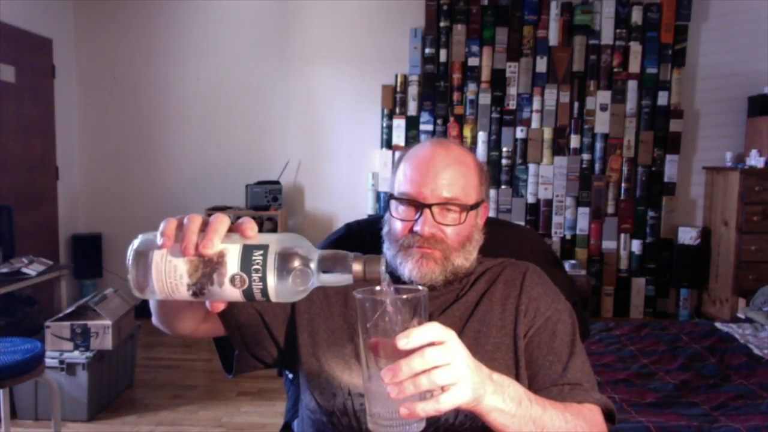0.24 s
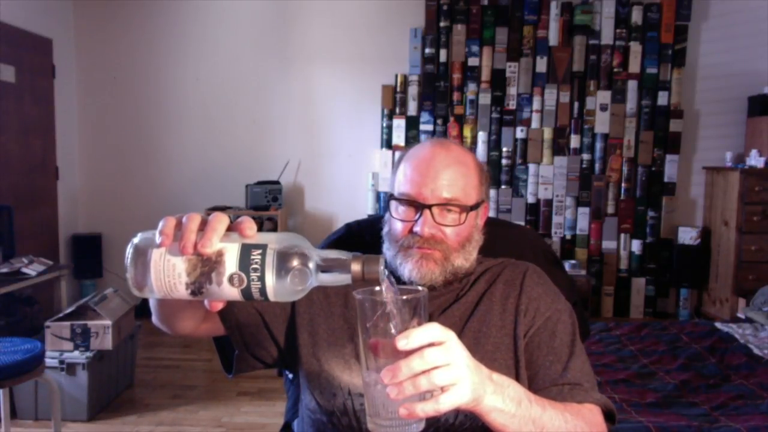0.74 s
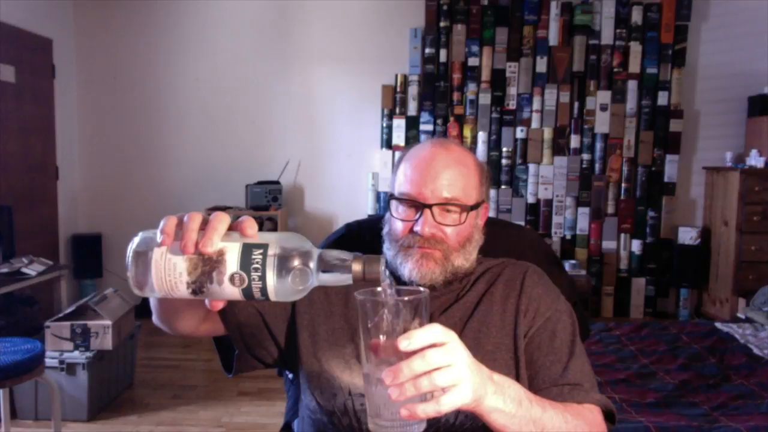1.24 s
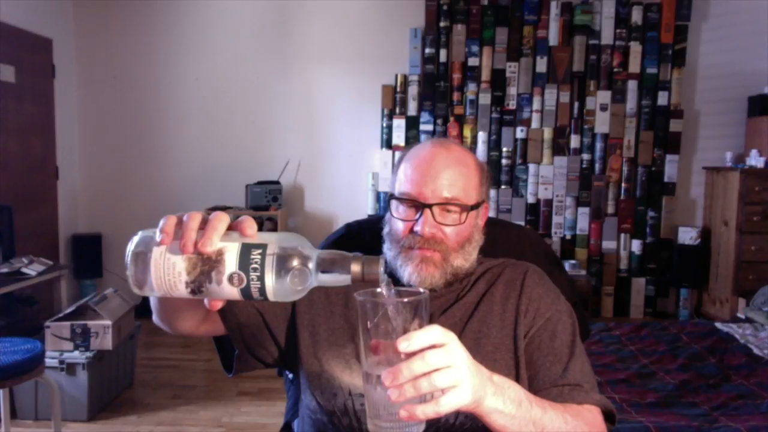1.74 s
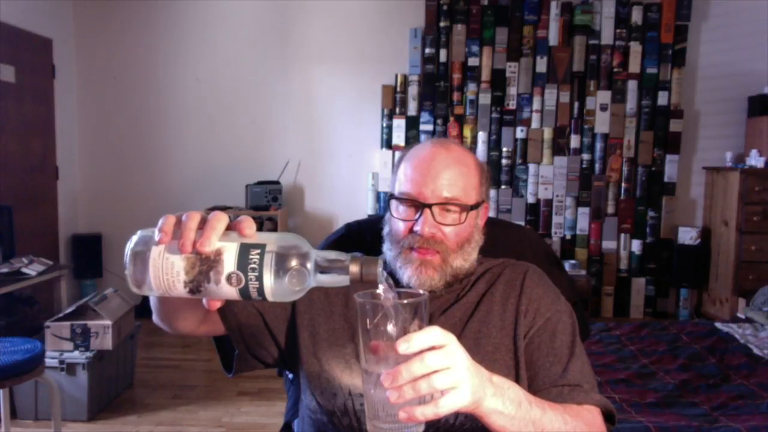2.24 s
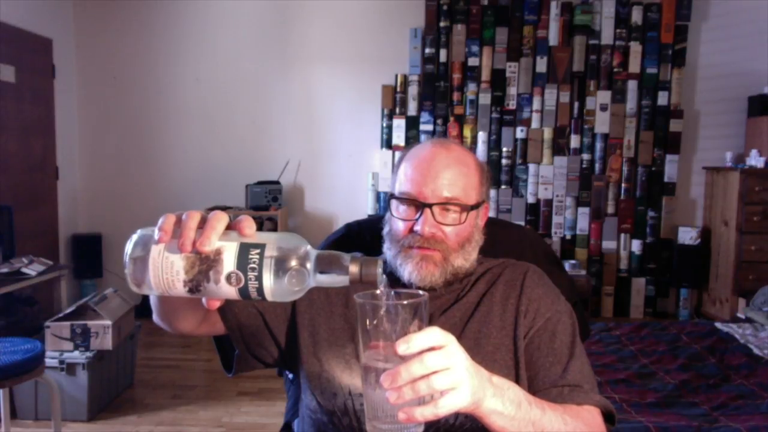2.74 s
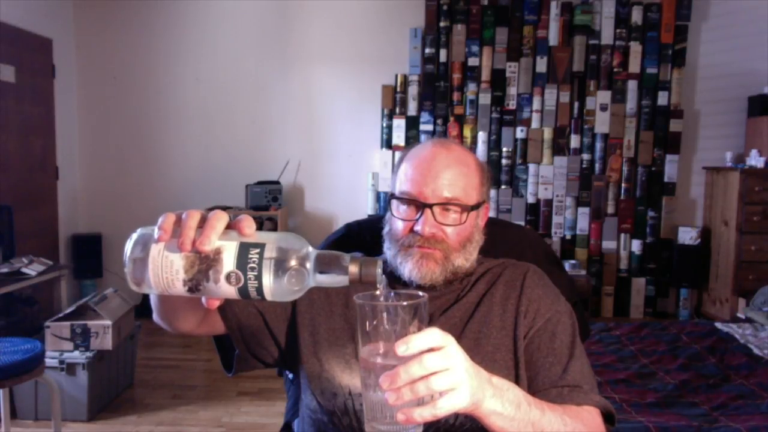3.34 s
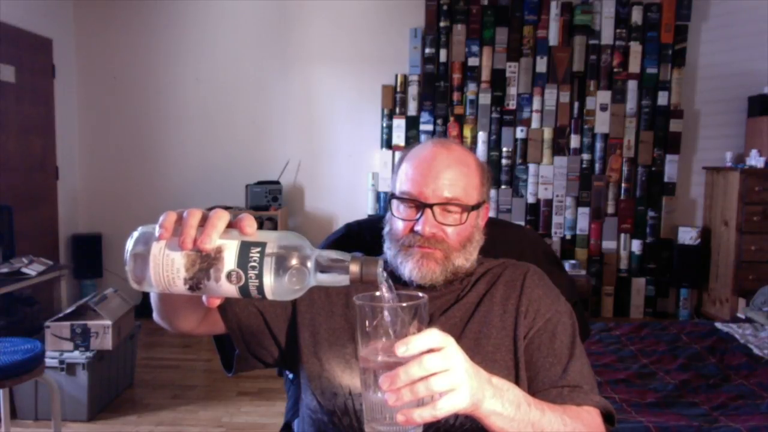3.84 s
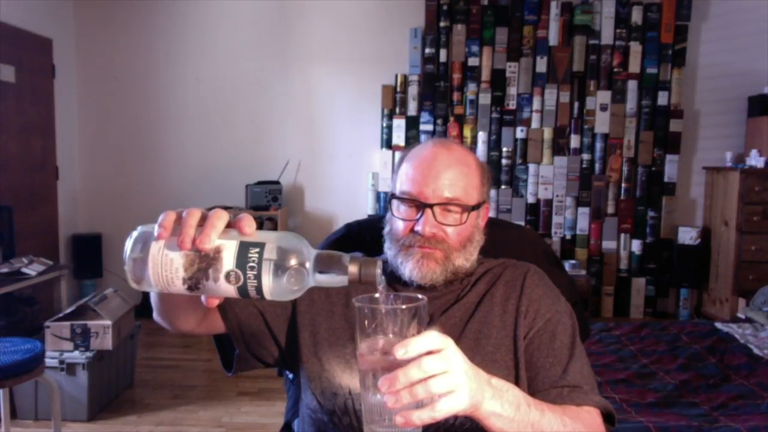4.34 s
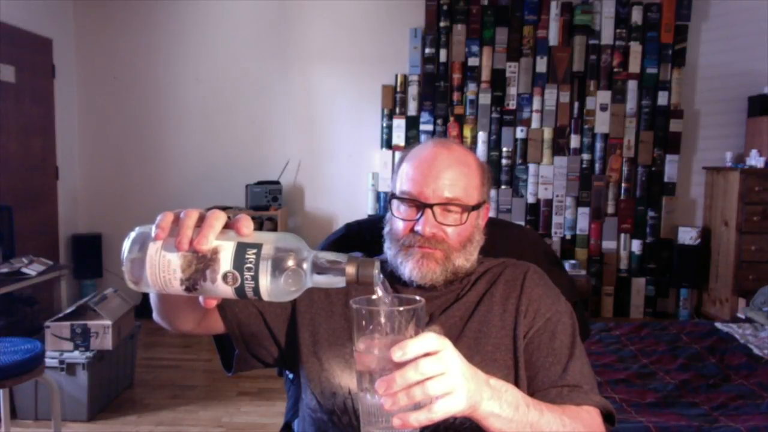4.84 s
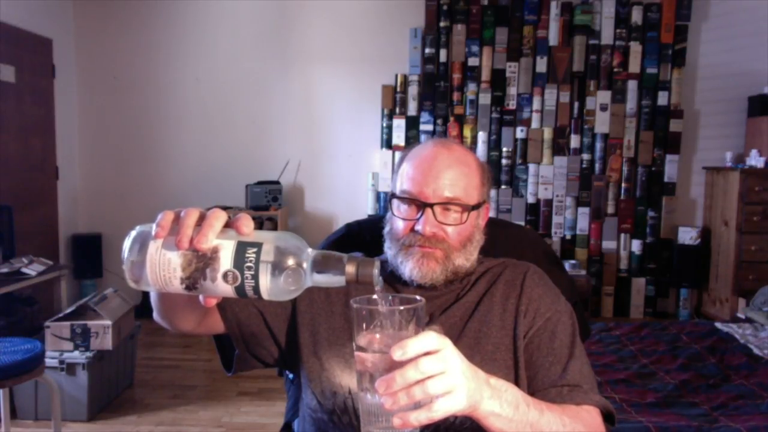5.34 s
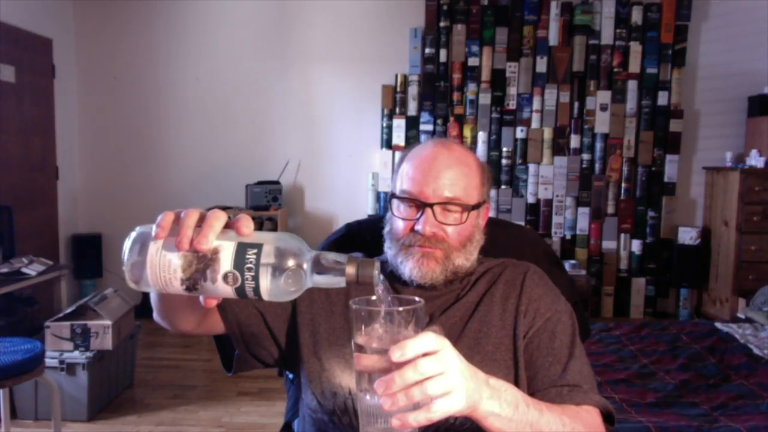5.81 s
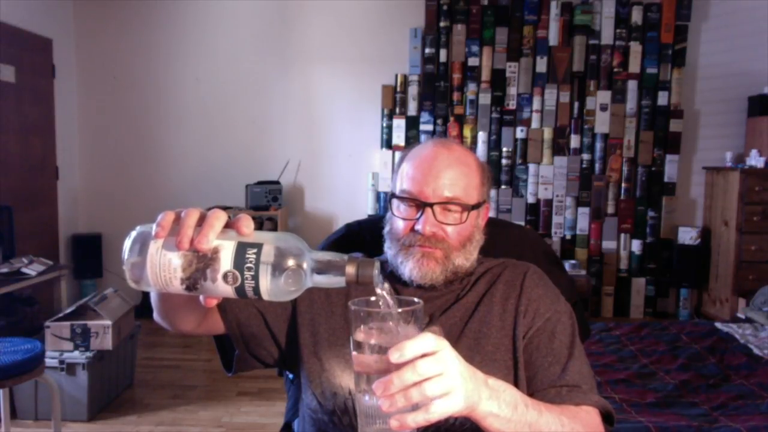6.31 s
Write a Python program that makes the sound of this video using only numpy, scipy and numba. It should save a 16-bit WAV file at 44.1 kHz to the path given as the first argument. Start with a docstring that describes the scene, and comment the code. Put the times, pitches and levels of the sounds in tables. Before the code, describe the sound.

Water glugs from a glass bottle into a tall drinking glass in quick uneven gulps, with bright splashes and popping bubbles in a small room.

```python
"""Glugs of water poured from a bottle ring in a tall drinking glass, in a small furnished room, a metre from
the microphone: each plunge rings the air column, and further glugs ring beside the column's main pitch.
Splashes and small pops are clusters of high, short rings; fizz is thousands of tiny ones.
The mouth of the glass beams the treble at the ceiling, which returns every pop 6 ms later, before the walls.
A room tail of decaying noise follows; the rush of the stream, a faint hum and hiss lie underneath."""
import sys
import numpy as np
from scipy import signal
from scipy.fft import rfft, irfft
from scipy.io import wavfile
from numba import njit

SR = 44100
rng = np.random.default_rng(int(sys.argv[2]) if len(sys.argv) > 2 else 0)


def magnitude_from_level(level_db):
    """Linear magnitude for a level in decibels (20 dB per decade)."""
    exponent = np.asarray(level_db, float) / 20
    return 10 ** exponent


def master_out(mix):
    """Clip the mix to full scale and print it as 16-bit PCM to the path in sys.argv[1]."""
    frames = np.transpose(np.atleast_2d(mix))
    ceiling = np.clip(frames, -1, 1)
    pcm = np.round(ceiling * 32767).astype(np.int16)
    wavfile.write(sys.argv[1], SR, pcm)


N = 289913  # length in samples


# air column above the water, mostly rising as the glass fills: t/s, f/Hz, fizz gain/dB
AIR_COLUMN = [(0, 938, -59), (.9, 854, -55), (1.6, 828, -61.5), (2.1, 926, -53), (2.9, 911, -63),
              (3.4, 1091, -53.5), (3.6, 980, -64), (4.1, 1127, -58.5), (5.1, 1133, -68.5),
              (5.6, 1079, -63.5), (6.57, 1120, -61)]
# slugs of water plunging in: t/s, level/dB (peak), decay/cycles
PLUNGES = [(.001, -28.5, 0.81), (.546, -33, 2.8), (0.601, -32, 2), (.813, -25, 6.7), (.878, -25.5, 10.6),
           (0.916, -26, 3.5), (1.124, -27, 2.7), (1.166, -29.5, 9.2), (1.264, -29, 8.3),
           (1.526, -37.5, 4.5), (1.557, -26, 6.1), (1.634, -31.5, 2.9), (1.726, -31, 4.4),
           (2.096, -21, 8.1), (2.155, -25, 3.1), (2.434, -38.5, 5.4), (2.56, -31, 4.4), (2.793, -33, 7.9),
           (2.909, -23, 3), (2.963, -21, 1.8), (3.199, -24, 3), (3.231, -33, 5.9), (3.414, -24, 7.4),
           (3.562, -28, 4.5), (3.6, -32, 3.2), (3.737, -38, 7), (3.847, -35, 3.5), (3.989, -26, 3),
           (4.032, -33.5, 10.5), (4.069, -26.5, 6.3), (4.18, -30.5, 3.8), (4.286, -16.5, 1.43),
           (4.524, -26, 0.93), (4.563, -22.5, 5.9), (4.678, -31, 9.4), (4.761, -32.5, 4.1),
           (4.852, -24.5, 1.3), (4.95, -30.5, 2.5), (5.117, -30.5, 12.4), (5.239, -31.5, 2.6),
           (5.293, -34, 2.4), (5.682, -29, 2.2), (5.759, -30, 9.9), (5.868, -31, 7.2), (5.966, -27.5, 0.81),
           (6.122, -32, 9.3), (6.432, -34, 2.7)]
PLUNGE_SCATTER = 0.03  # standard deviation, share of the pitch


def plunges():
    """Each slug of water rings the air column at its pitch of the moment and sheds small bubbles."""
    s, db, cycles = np.transpose(PLUNGES)
    column_s, column_hz, _ = np.transpose(AIR_COLUMN)
    scatter = 1 + PLUNGE_SCATTER * rng.standard_normal(len(s))
    hz = np.interp(s, column_s, column_hz) * scatter
    rings = bubbles(s, db, hz, cycles / hz, rise_share=0.17, glide=0.006)
    return rings + shed(s, db, hz, count=3)


# rings off the column's main pitch: low bubbles, and late in the pour a higher resonance
# near 1.5 kHz: t/s, level/dB (peak), f/Hz
GLUGS = [(.035, -35.5, 552), (.14, -25, 690), (.312, -32.5, 760), (.326, -44, 362), (0.702, -38.5, 997),
         (0.748, -37.5, 545), (.801, -26.5, 673), (1.063, -32, 585), (1.143, -34, 1002), (1.48, -36.5, 950),
         (1.677, -43, 533), (2.18, -23.5, 1064), (2.181, -27.5, 804), (2.521, -32.5, 1074),
         (2.712, -36, 1057), (2.791, -33, 1183), (2.961, -42, 438), (3.2, -38.5, 493), (2.193, -44.5, 421),
         (3.6, -39, 457), (3.6, -39, 638), (3.946, -43.5, 348), (4.181, -36.5, 634), (4.286, -34, 468),
         (4.286, -26.5, 619), (4.34, -38.5, 666), (4.526, -42, 500), (4.58, -34.5, 612),
         (4.851, -30.5, 586), (4.95, -41.5, 447), (5.193, -33.5, 613), (5.29, -36.5, 626),
         (5.345, -32.5, 1510), (5.38, -33.5, 1490), (5.421, -35, 1510), (5.535, -31, 1366),
         (5.616, -38.5, 573), (5.871, -36, 647), (5.965, -37.5, 466), (5.989, -38, 373),
         (6.118, -30.5, 1460), (6.329, -24, 1503), (6.281, -37, 730), (6.326, -29.5, 634)]
GLUG_CYCLES = 3.92  # decay to 1/e


def glugs():
    """Low bubbles and a late, higher resonance ring for several cycles, glide slightly up and shed bubbles."""
    s, db, hz = np.transpose(GLUGS)
    rings = bubbles(s, db, hz, GLUG_CYCLES / hz, rise_share=0.2, glide=0.011)
    return rings + shed(s, db, hz, count=3)


# bubbles shed by a parent, linking the notes: level below it, mean delay, pitch spread (+- log), decay
SHED_DB, SHED_LATE_S, SHED_SPREAD, SHED_CYCLES = -9.5, 0.025, 0.14, 4.1


def shed(s, db, hz, count):
    """Daughter bubbles trail their parents, weaker and detuned."""
    s, db, hz = np.repeat([s, db, hz], count, axis=1)
    late, big, pitch = rng.random((len(s), 3)).T
    s = s - SHED_LATE_S * np.log(1 - late)
    db = db + SHED_DB - 8 * big
    hz = hz * np.exp(SHED_SPREAD * (2 * pitch - 1))
    return bubbles(s, db, hz, SHED_CYCLES / hz, rise_share=0.29, glide=0.028)


def bubbles(s, db, hz, fall_s, rise_share, glide):
    """Rings at the given peak levels; the rise takes a share of the fall."""
    fall = np.maximum(fall_s * SR, 1)
    share = max(rise_share, .01)
    # highest point of the swell-and-decay envelope
    peak = (share / (3 + share)) ** share * (3 / (3 + share)) ** 3
    start = (s * SR).astype(int).clip(0, N - 1)
    return ring(start, hz, share * fall, fall, glide, magnitude_from_level(db) / peak, N)


@njit
def ring(start, hz, rise, fall, glide, size, n):
    """Sines that swell in `rise` samples, die in `fall` samples and slide up meanwhile."""
    out = np.zeros(n)
    for k in range(len(start)):
        phase, step = 0., 2 * np.pi * hz[k] / SR
        for i in range(min(int(7 * fall[k]), n - start[k])):
            envelope = (1 - np.exp(-i / rise[k])) ** 3 * np.exp(-i / fall[k])
            out[start[k] + i] += size[k] * envelope * np.sin(phase)
            phase += step * (1 + glide * min(i / fall[k], 2))
    return out


POP_UP_DB, POP_UP_DB_PER_OCTAVE, POP_UP_LEAST_DB = 8.5, 13.5, -8


def beam_db(hz):
    """Ceiling echo of a pop over its direct sound: the glass beams high pitches upward."""
    rise = POP_UP_DB_PER_OCTAVE * np.log2(hz / 7500)
    return np.clip(POP_UP_DB + rise, POP_UP_LEAST_DB, POP_UP_DB)


# levels in these three tables are nominal: droplet scatter and glass colour follow
# blunt, wide splashes: t/s, level/dB, f/Hz (centre)
SPLASHES = [(0.014, -25, 8300), (0.0369, -17, 8000), (0.0377, -23, 13400), (0.547, -30, 1630),
            (0.65, -33, 10300), (0.727, -24, 14000), (0.9042, -25.5, 4100), (1.2413, -30, 11500),
            (1.24, -18, 5200), (1.416, -28.5, 11900), (1.5328, -24.5, 9100), (2.18, -20, 10300),
            (2.437, -23.5, 9500), (2.586, -33, 9600), (2.626, -24.5, 7900), (2.629, -21.5, 13100),
            (2.68, -30.5, 9200), (2.737, -27.5, 6760), (2.738, -28, 11900), (2.7463, -26, 3280),
            (2.961, -25.5, 7800), (3.2004, -20, 11550), (3.201, -29, 6060), (3.2763, -22, 5560),
            (3.599, -25.5, 10200), (3.7349, -24, 3680), (3.837, -29, 7700), (3.9372, -18, 11300),
            (3.981, -28.5, 4800), (4.067, -20.5, 5300), (4.094, -25, 12400), (4.1805, -21.5, 12100),
            (4.228, -28, 7560), (4.285, -26, 4650), (4.2855, -20, 1740), (4.4281, -22.5, 12200),
            (4.4276, -24, 7400), (4.478, -24, 13300), (5.418, -28.5, 3640), (5.761, -22, 11200),
            (5.76, -25, 1510), (5.869, -23.5, 1880), (6.0846, -26.5, 10900), (6.2767, -26.5, 7200),
            (6.2784, -22, 1640), (6.3221, -23.5, 2230), (6.4786, -22, 3440), (6.4831, -27, 8360)]
# small bubbles with a clear pitch: t/s, level/dB, f/Hz
POPS = [(5.341, -42.5, 4400), (5.684, -40, 4380), (0.013, -26.5, 3600), (0.117, -39.5, 4500),
        (.450, -47, 8170), (.300, -47, 8100), (0.489, -40.5, 5350), (.935, -37, 2200), (1.22, -36.5, 3000),
        (.938, -39, 8000), (1.528, -33, 6000), (1.070, -40, 11880), (1.177, -37.5, 1900), (2.1, -35, 3250),
        (1.883, -33.5, 5050), (1.906, -34, 3100), (1.993, -44, 7150), (5.631, -46, 7900),
        (1.221, -41.5, 12300), (2.299, -44, 8000), (2.341, -47, 7900), (2.458, -37.5, 4970),
        (2.458, -31.5, 5720), (2.483, -38.5, 3780), (4.476, -39, 1873), (2.4, -37, 4000),
        (1.344, -39, 15000), (2.767, -38.5, 4780), (3.382, -41.5, 11000), (3.3, -41.5, 1760),
        (3.5, -34.5, 5270), (3.6, -38.5, 3150), (4.3984, -36.5, 5100), (4.747, -39.5, 3100),
        (5.356, -43.5, 10800), (4.982, -38.5, 11500), (2.0377, -42.5, 11340), (5.0967, -36, 8640),
        (1.415, -36, 4150), (5.418, -42, 10500), (2.323, -43, 13000), (2.4645, -38, 14000),
        (5.2, -35, 5100), (5.967, -38, 5750), (5.992, -38.5, 1600), (6.0633, -27, 5080), (2.6, -37, 15300),
        (6.411, -47.5, 12180), (6.508, -33.5, 1980), (0.016, -27, 1990), (0.225, -42, 9900),
        (0.344, -24.5, 13500), (0.345, -28.5, 7430), (0.4512, -34.5, 13000), (0.5804, -34, 3900),
        (0.5992, -35.5, 6900), (0.8658, -29.5, 4050), (0.866, -36, 12300), (0.8669, -37.5, 8000),
        (1.0536, -35, 5200), (1.0676, -38.5, 7770), (1.1662, -32.5, 10300), (1.3722, -34.5, 8500),
        (1.372, -28.5, 12260), (1.415, -37, 7400), (1.4543, -32, 7680), (1.7293, -39.5, 7900),
        (1.8373, -24, 8500), (1.889, -28.5, 2640), (1.884, -34, 6130), (2.0832, -31.5, 8840),
        (2.05, -39, 2900), (2.143, -32, 5240), (2.3, -35.5, 3720), (3.0308, -44, 11950),
        (2.9513, -32, 3880), (4.038, -36, 3000), (3.078, -29.5, 2720), (4.427, -34.5, 1750),
        (3.081, -36.5, 5400), (3.5638, -41, 12700), (3.2491, -29, 2700), (3.5634, -33, 5070),
        (3.575, -35, 4100), (3.567, -37.5, 1810), (3.673, -33, 13600), (3.6, -31, 11100),
        (4.0664, -37.5, 8440), (4.067, -23, 3030), (4.226, -27, 3890), (4.23, -33, 10660),
        (4.2843, -29.5, 8750), (4.354, -29.5, 2960), (4.428, -29, 5370), (4.4258, -25, 3550),
        (4.4278, -25, 13900), (4.6293, -32, 2070), (4.637, -24, 4270), (5.3, -32.5, 13900),
        (4.853, -37.5, 2940), (4.986, -43, 8970), (5.0706, -38.5, 13060), (3.758, -42, 8100),
        (3.2, -43, 9800), (5.359, -37, 2760), (5.538, -38.5, 5700), (4.0678, -35, 14600),
        (5.691, -43, 9340), (5.8687, -30.5, 13150), (5.8676, -31.5, 6600), (6.275, -27.5, 3240)]
# small bubbles that burst toward the microphone and send little upward: t/s, level/dB, f/Hz
SIDE_POPS = [(.8168, -36, 13400), (3.2508, -16, 6550), (4.716, -42, 12700), (4.852, -39.5, 6750),
             (5.7345, -29.5, 9600), (5.9663, -40.5, 8140), (6.137, -36, 13600), (6.344, -38.5, 7640)]
SPLASH_SHARP, POP_SHARP = 2.33, 9.5  # sharpness: centre over spread
# ceiling echo over the direct sound; splashes lose it as the glass fills
SPLASH_UP_DB, SPLASH_UP_LOSS_DB_PER_S, SIDE_UP_DB = 8.5, 1.5, -3.5


def treble_events():
    """Rows (t/s, level/dB, f/Hz, sharpness, upward gain/dB) of splashes and pops."""
    rows = []
    for s, db, hz in SPLASHES:
        up_db = SPLASH_UP_DB - SPLASH_UP_LOSS_DB_PER_S * s + min(beam_db(hz), 0)
        rows.append((s, db, hz, SPLASH_SHARP, up_db))
    rows += [(s, db, hz, POP_SHARP, beam_db(hz)) for s, db, hz in POPS]
    return rows + [(s, db, hz, POP_SHARP, SIDE_UP_DB) for s, db, hz in SIDE_POPS]


def pops(count):
    """Each splash or pop throws droplets within 0.6 ms, heard directly and as sent to the ceiling."""
    s, db, hz, sharp, up_db = np.repeat(treble_events(), count, axis=0).T
    late, pitch, big = rng.random((len(s), 3)).T
    # the droplets share out the range of the splash: a blunt splash spreads them widely
    slot = np.arange(len(s)) % count
    place = 2 * (slot + pitch) / count - 1
    hz = np.minimum(hz * np.exp(0.76 * place / sharp), .4 * SR)
    # at equal sharpness the smallest droplets ring for the most cycles
    cycles = (0.94 + 0.64 * sharp) * (hz / 6000) ** 0.21
    s = s + 0.0006 * late ** 2
    db = db - 4.0 - 4 * big
    near = favour(bubbles(s, db, hz, cycles / hz, 0.23, 0.))
    up = favour(bubbles(s, db + up_db, hz, cycles / hz, 0.23, 0.))
    return near, up


# ranges that glass and microphone favour: f/Hz, width/Hz, gain/dB
FAVOURED = [(1880, 700, -1), (3040, 268, 2), (4205, 1900, -3.5), (5040, 210, -7), (5675, 470, -2.5),
            (7020, 1170, -12), (8330, 2200, 3.5), (11270, 4800, 6), (14800, 1600, 1.5)]


def favour(x):
    """Parallel band-passes lift the favoured ranges over the valleys between them."""
    return sum(magnitude_from_level(db) * band(x, hz, width) for hz, width, db in FAVOURED)


def band(x, hz, width):
    """Band-pass with a fixed centre."""
    return svf(x, np.full(N, 1. * hz), 1. * width)


@njit
def svf(x, hz, width):
    """State-variable band-pass with a moving centre, gain 1 there."""
    y, b, l = np.empty(len(x)), 0., 0.
    for i in range(len(x)):
        g, k = np.tan(np.pi * hz[i] / SR), width / hz[i]
        v = (b + g * (x[i] - l)) / (1 + g * (g + k))
        b, l, y[i] = 2 * v - b, l + 2 * g * v, k * v
    return y


def gulp_times():
    """Moments of all plunges and glugs, in s."""
    return np.array([row[0] for table in (PLUNGES, GLUGS) for row in table])


# share of the fizz that trails a gulp, and its mean delay
WAKE_SHARE, WAKE_S = 0.76, .045


def fizz(count, scatter_db):
    """Countless tiny bubbles, most in the wake of a gulp, ring the air column and the favoured ranges."""
    when, pitch, sharp, big, wake = rng.random((count, 5)).T
    gulps = gulp_times()
    gulp = gulps[(when * len(gulps)).astype(int)]
    trailing = gulp - WAKE_S * np.log(1 - wake / WAKE_SHARE % 1)
    s = np.where(wake < WAKE_SHARE, trailing, when * N / SR)
    hz = 600 * 26 ** pitch ** .85
    db = scatter_db * big ** 3 + 1.7 * np.log2(hz / 3000)
    cycles = 3.48 + 8 * sharp ** 2
    spray = bubbles(s, db, hz, cycles / hz, rise_share=0.49, glide=0.0041)
    # the column's pitch and the fizz gain move through the pour
    t = np.arange(N) / SR
    column_s, column_hz, gain_db = np.transpose(AIR_COLUMN)
    centre = np.interp(t, column_s, column_hz)
    gain = magnitude_from_level(np.interp(t, column_s, gain_db))
    column = svf(svf(spray, centre, 800.0), centre, 800.0)
    return gain * (column + favour(spray))


CEILING_MS = 6.02


def delayed(x, ms):
    """The same sound a little later."""
    lag = int(ms * SR / 1000)
    return np.concatenate([np.zeros(lag), x[:N - lag]])


# single reflections from desk and walls: t/ms, level/dB
ECHOES = [(2.1, -10.5), (9.6, -17.5), (15.4, -13), (26.2, -18.5)]
ROOM_T60_S, TREBLE_T60_S, ROOM_DB = 0.23, 0.19, -3  # level: whole energy of the tail


def room(x):
    """A few clear reflections, then a dense tail that builds within milliseconds and loses its treble first."""
    t = np.arange(int(.4 * SR)) / SR
    noise = rng.standard_normal(len(t))
    dull = signal.sosfilt(signal.butter(2, 6000, fs=SR, output="sos"), noise)
    tail = dull * magnitude_from_level(-60 * t / ROOM_T60_S) + (noise - dull) * magnitude_from_level(-60 * t / TREBLE_T60_S)
    tail *= np.clip(t / 0.0033, 0, 1)
    tail *= magnitude_from_level(ROOM_DB) / np.sqrt(np.sum(tail ** 2))
    reflections = sum(magnitude_from_level(db) * delayed(x, ms) for ms, db in ECHOES)
    return reflections + signal.fftconvolve(x, tail)[:N]


def at_level(x, db):
    """Sets the rms level in dB."""
    return magnitude_from_level(db) * x / x.std()


def rush():
    """The even rush of the stream: coloured noise that fades as the fall shortens in the filling glass."""
    fade = magnitude_from_level(-1.5 * np.arange(N) / SR)  # 1.5 dB per s
    return at_level(favour(rng.standard_normal(N)) * fade, -69)


def hum():
    """A wavering hum: noise through a 7 Hz wide band."""
    return at_level(band(rng.standard_normal(N), 119.8, 7.0), -71)


# spectrum of the room hiss: f/Hz, level/dB (relative, per Hz)
HISS = [(40, -23), (110, -8), (400, -19.5), (3000, -25), (16000, -31.5)]


def hiss():
    """Room hiss, strongest in the bass: noise shaped in the spectrum."""
    hz, db = np.transpose(HISS)
    f = np.maximum(np.fft.rfftfreq(N, 1 / SR), 1)
    slope = np.interp(np.log(f), np.log(hz), db)
    return at_level(irfft(rfft(rng.standard_normal(N)) * magnitude_from_level(slope), N), -64)


def scene():
    """Direct sound, ceiling echo, room, and the steady layers underneath."""
    low = plunges() + glugs()
    spray = fizz(count=7000, scatter_db=11.5)
    near, up = pops(count=4)
    upward = up + magnitude_from_level(-26.0) * spray + magnitude_from_level(-9.5) * low
    ceiling = delayed(upward, CEILING_MS)
    # the walls hear both what leaves sideways and what went up
    walls = room(low + spray + magnitude_from_level(-0.5) * near + magnitude_from_level(-3.5) * up)
    mix = low + spray + near + ceiling + walls + rush() + hum() + hiss()
    return mix[None]


# dips in the response between glass and microphone: f/Hz, width/Hz, share removed (0-1)
DIPS = [(1519, 126, 0.86)]


def response_dips(x):
    """Takes a share of a narrow band out of the sound."""
    for hz, width, share in DIPS:
        x = x - share * band(x[0], hz, width)
    return x


def roll_off(x):
    """The treble ends steeply here."""
    return signal.sosfilt(signal.butter(12, 17150, fs=SR, output="sos"), x)


def record(dry):
    """A narrow dip, a bass cut below 60 Hz, and a steep step down near 16 kHz."""
    bass_cut = signal.butter(3, 60, "highpass", fs=SR, output="sos")
    treble_step = signal.ellip(6, .3, 17, 15850, fs=SR, output="sos")
    mix = signal.sosfilt(np.vstack([bass_cut, treble_step]), response_dips(dry))
    return roll_off(mix)


dry = scene()
out = record(dry)
master_out(out)
```